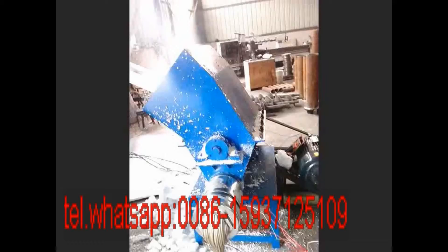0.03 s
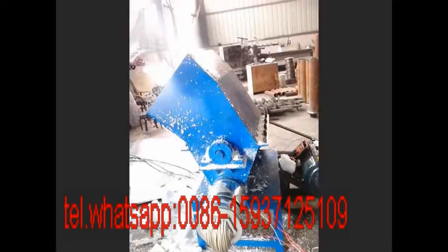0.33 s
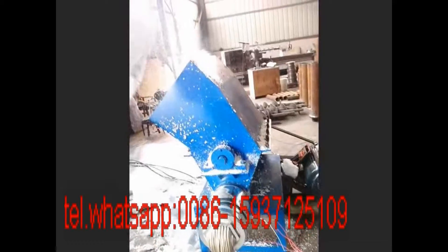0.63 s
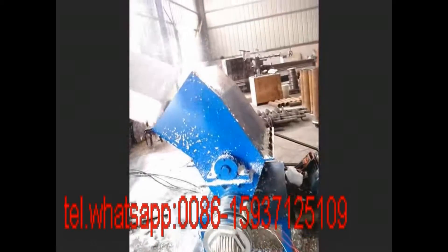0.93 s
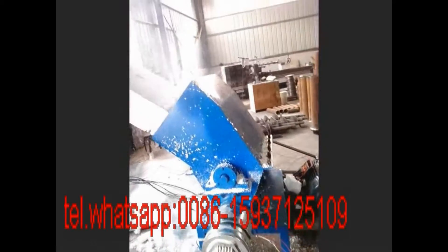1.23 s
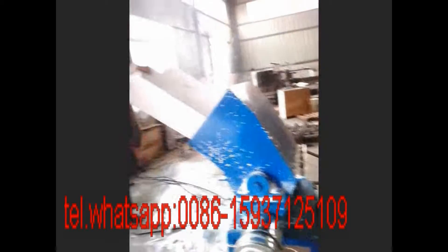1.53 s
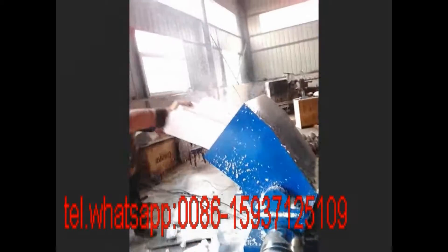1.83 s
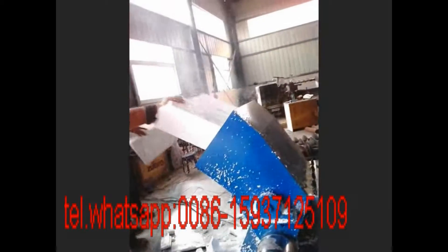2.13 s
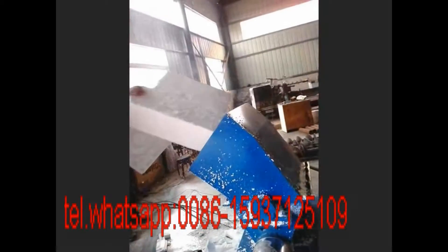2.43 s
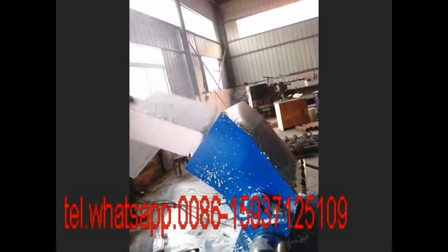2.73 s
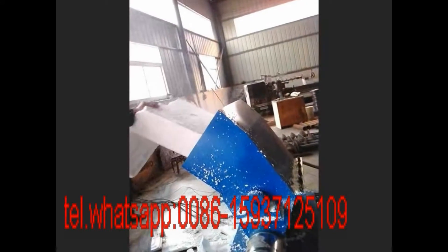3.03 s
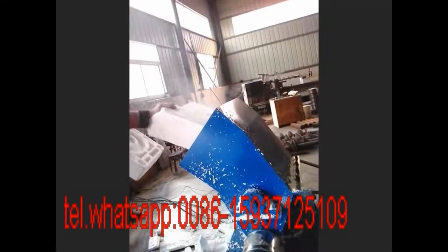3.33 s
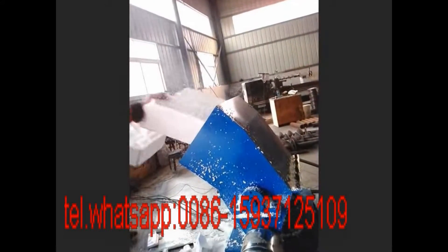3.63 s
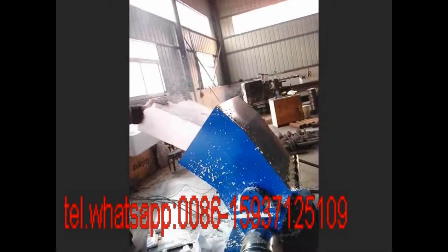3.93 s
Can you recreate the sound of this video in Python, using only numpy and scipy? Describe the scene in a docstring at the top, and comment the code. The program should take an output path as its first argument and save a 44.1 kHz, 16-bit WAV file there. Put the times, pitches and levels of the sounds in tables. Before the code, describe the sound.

Shredding machine chewing foam up close, with uneven crunching swells, thumps and brief squeaks.

```python
"""Foam shredder, close by, in a workshop: knives chip slabs in a dense stream of tiny fractures.
Each bite swells into clatter, crunch, rasp and hiss. Foam rubbing on steel squeaks.
The rotor hums at the knife-pass rate; lumps that catch in it thump the steel hopper.
Behind it: low workshop rumble and a short room tail."""
import sys
import numpy as np
from scipy import signal
from scipy.fft import rfft, irfft
from scipy.io import wavfile
from scipy.ndimage import uniform_filter1d, minimum_filter1d

SR = 44100
rng = np.random.default_rng(int(sys.argv[2]) if len(sys.argv) > 2 else 0)


def generate_wav(signal):
    """Clip the signal to [-1, 1] and save it as 16-bit WAV at the path in sys.argv[1]."""
    frames = np.transpose(np.atleast_2d(signal))
    scaled = np.clip(frames, -1, 1) * 32767
    pcm = np.round(scaled).astype(np.int16)
    wavfile.write(sys.argv[1], SR, pcm)


N = 176400

# workshop rumble: spectrum (f/Hz, gain/dB), level
RUMBLE_EQ, RUMBLE_DB = [(55, -25.5), (110, -17.5), (600, -29)], -31.5
# rotor hum between thumps: t/s, level/dB
HUM_LEVELS = [(.2, -25.5), (.32, -43), (.42, -24.5), (.78, -25.5), (.84, -44), (1.06, -37), (1.12, -25),
              (1.5, -20), (1.74, -22.5), (1.86, -15), (2.24, -27.5), (3.45, -30), (3.6, -22.5), (3.8, -23),
              (4, -43)]
# steady hopper boom: t/s, level/dB
BOOM_LEVELS = [(.3, -31), (.42, -21.5), (1.05, -26.5), (1.85, -26), (2.2, -29.5), (3.3, -26.5), (3.52, -35)]
# resonances: f/Hz, nominal width/Hz, level/dB
HOPPER_MODES = [(256, 27, -4.5), (280.8, 33, 2)]
HOUSING_AIR_MODES = [(133.1, 11.8, -1), (155.1, 18.5, 2.5), (203.6, 8.3, 1.5)]
# lumps catching in the rotor: t/s, hum surge/dB, hopper boom/dB
LUMP_THUMPS = [(0.357, -15.5, -17), (.67, -19, -27), (.712, -34, -15.5), (.775, -29, -16),
               (0.926, -19.5, -20.5), (1.261, -16, -41), (1.669, -16.5, -21.5), (2.106, -15.5, -36),
               (2.325, -21.5, -28), (2.528, -15.5, -18.5), (2.675, -24.5, -27), (2.797, -27, -17.5),
               (2.847, -21, -34), (3.175, -23.5, -35), (3.365, -15, -26)]
# foam on steel: t/s, f/Hz, level/dB
LOUD_SQUEAKS = [(0.439, 4640, -22), (2.805, 6830, -19.5), (3.397, 6640, -7), (3.428, 3307, -18.5),
                (3.461, 4380, -19)]
# steady chipping between bites: t/s, crunch/dB, hiss/dB
FEED_LEVELS = [(.2, -33, -36.5), (.42, -28, -26), (.8, -27.5, -25), (1.12, -30, -32), (1.55, -30.5, -31.5),
               (1.85, -28, -24.5), (2.24, -28, -26), (2.9, -28.5, -26), (3.35, -28, -28.5),
               (3.6, -37.5, -34), (4, -33.5, -33.5)]
# knife bites: t/s, length/s, clatter/dB, crunch/dB, rasp/dB, hiss/dB
KNIFE_BITES = [(0.532, 0.075, -36, -23, -44, -23.5), (0.633, 0.057, -36, -21.5, -23.5, -21.5),
               (0.736, 0.065, -43, -22, -27.5, -25.5), (0.94, 0.057, -25, -18.5, -23.5, -25.5),
               (1.163, 0.064, -32, -23.5, -40, -32), (1.369, 0.079, -29.5, -29, -34, -28.5),
               (1.593, 0.048, -23, -22, -33, -24), (1.683, 0.047, -19, -24, -51, -50),
               (1.721, 0.049, -33, -17, -29.5, -21), (2.083, 0.041, -23.5, -34, -60, -25),
               (2.298, 0.034, -29, -19, -46, -39), (2.417, 0.069, -31, -23.5, -44, -19.5),
               (2.512, 0.074, -27, -24, -40, -23.5), (2.606, 0.089, -21, -20, -60, -25),
               (2.811, 0.013, -30, -25, -46, -29), (3.11, 0.037, -21.5, -58, -33, -23.5),
               (3.331, 0.039, -18, -28, -39, -23), (3.386, 0.029, -31, -23.5, -22.5, -10.5),
               (3.424, 0.085, -43, -48, -23.5, -16)]
# chipping spectra: f/Hz, gain/dB
CLATTER_EQ = [(230, -29), (330, -10), (395, 1), (490, -1.5), (660, 1), (790, -8.5), (1300, -27.5)]
CRUNCH_EQ = [(550, -33.5), (850, -0.5), (1200, 0), (1720, 0.5), (2050, -9.5), (5000, -28)]
RASP_EQ = [(1500, -27), (2400, 5), (3300, 10), (3800, 4), (4600, 5), (5600, -18), (6800, 0.5)]
HISS_EQ = [(1200, -45), (2200, -8), (3800, -6), (4700, 0.5), (6200, -0.5), (6700, 5), (7100, 7),
           (7500, -14), (8000, -37.5)]

ATTACK_S, RELEASE_S, THUMP_S = 0.014, 0.024, 0.037
ROOM_T60_S, ROOM_MID_DB, ROOM_SIDE_DB, PAN_DB = 0.15, -10, -20.5, -27.5
KNIFE_PASS_HZ, ROTOR_DRIFT, HUM_FLUTTER_DB = 183.4, 0.0099, 3
STIR_DB, THUD_DB, CLATTER_DB = 1, -8, 0.5
SQUEAK_S, RUB_HZ, RUB_LOG_SPREAD, RUB_GAIN_DB = 0.0311, 5730, .15, -6
START_S, FADE_S, CEILING = 0.16, 0.056, .8
BAND_HZ, MIRROR_CARRIER_HZ, MIRROR_DB, TOP_HZ = 7650, 16000, -16, 9450


def undb(db):
    """dB to gain."""
    return 10 ** (np.asarray(db) / 20)


def unit(x):
    """Scale to rms 1."""
    return x / np.sqrt(np.mean(x ** 2) + 1e-18)


def curve(table, column=1):
    """Gain over time from one dB column."""
    rows = np.array(table)
    return undb(np.interp(np.arange(N) / SR, rows[:, 0], rows[:, column]))


def walk(rate_hz):
    """Smooth random drift, rms 1."""
    f = np.arange(N // 2 + 1) * SR / N
    return unit(irfft(rfft(rng.standard_normal(N)) * np.exp(-(f / rate_hz) ** 2), N))


def colour(x, eq):
    """Filter by (f/Hz, gain/dB) points; rms 1."""
    points, f = np.array(eq), np.arange(N // 2 + 1) * SR / N
    gain_db = np.interp(np.log(f + 1), np.log(points[:, 0]), points[:, 1])
    return unit(irfft(rfft(x) * undb(gain_db), N))


def ring(x, modes):
    """Steep-sided resonances driven by x."""
    out = 0
    for hz, width_hz, db in modes:
        b, a = signal.iirpeak(hz, hz / (1.39 * width_hz), fs=SR)
        out = out + undb(db) * unit(signal.lfilter(b, a, signal.lfilter(b, a, x)))
    return unit(out)


def clicks(per_s, spread_db):
    """Impulses of random time, size and sign."""
    size = undb(spread_db * np.minimum(rng.exponential(size=N), 2))
    return unit((rng.random(N) < per_s / SR) * size * np.sign(rng.standard_normal(N)))


def swell(start_s, length_s):
    """Envelope of one blow: attack, hold, release."""
    age_s = np.arange(N) / SR - start_s
    return np.clip(age_s / ATTACK_S, 0, 1) * np.exp(-np.maximum(age_s - length_s, 0) / RELEASE_S)


def rumble(db):
    """Workshop background: steady low noise."""
    return undb(db) * colour(rng.standard_normal(N), RUMBLE_EQ)


def room(x):
    """Diffuse tail from walls and clutter."""
    t = np.arange(SR // 2) / SR
    tail = rng.standard_normal(len(t)) * np.exp(-np.log(1000) * t / ROOM_T60_S) * (t > .003)
    return signal.fftconvolve(x, tail / np.sqrt(np.sum(tail ** 2)))[:N]


def thumps(column):
    """Lumps catch in the rotor: power sum of their envelopes."""
    return np.sqrt(sum((undb(row[column]) * swell(row[0], THUMP_S)) ** 2 for row in LUMP_THUMPS))


def rotor():
    """Passing knives push air; the hum wavers in pitch and level and surges at each thump."""
    phase = 2 * np.pi * np.cumsum(KNIFE_PASS_HZ * (1 + ROTOR_DRIFT * walk(16.4))) / SR
    flutter = unit(undb(HUM_FLUTTER_DB * walk(8)))
    return unit(np.sin(phase)) * np.hypot(flutter * curve(HUM_LEVELS), thumps(column=1))


def hopper():
    """Tumbling lumps drum on the hopper and stir the housing air; thumps swell both."""
    load = curve(BOOM_LEVELS)
    boom = ring(clicks(900, 0.94), HOPPER_MODES) * np.hypot(load, thumps(column=2))
    stir = np.sqrt(load * curve(FEED_LEVELS)) * undb(STIR_DB + 2 * walk(20))
    thud = undb(THUD_DB) * thumps(column=1)
    return boom + ring(clicks(1200, 0.68), HOUSING_AIR_MODES) * np.hypot(stir, thud)


def squeak(start_s, hz, length_s, glide=0.043, roughness=.03):
    """Stick-slip of foam on steel: one short, rough glide."""
    progress, out = np.linspace(0, 1, int(length_s * SR)), np.zeros(N + SR)
    jitter = np.interp(progress * length_s, np.arange(SR) / 1000, rng.standard_normal(SR))
    pitch_hz = hz * (1 + glide * rng.standard_normal() * (progress - .5) + roughness * jitter)
    tone = np.sqrt(2) * np.sin(2 * np.pi * np.cumsum(pitch_hz) / SR)
    at = int(start_s * SR)
    out[at:at + len(tone)] = np.sin(np.pi * progress) * tone
    return out[:N]


def rubbing(count=90):
    """Foam rubs on steel: a few loud squeaks, many small ones that follow the feed."""
    loud = sum(undb(db) * squeak(start_s, hz, SQUEAK_S) for start_s, hz, db in LOUD_SQUEAKS)
    small = 0
    for when, size, stretch in rng.random((count, 3)):
        hz = RUB_HZ * np.exp(RUB_LOG_SPREAD * rng.standard_normal())
        small += size * squeak(when * N / SR, hz, SQUEAK_S * (.5 + 2 * stretch))
    feed = curve(FEED_LEVELS, column=2)
    return loud + undb(RUB_GAIN_DB) * small * feed * unit(feed)


def fractures(eq, per_s, spread_db, depth_db, rate_hz):
    """Click stream; its bands swell and fade separately as pieces of changing size break off."""
    spectrum = rfft(colour(clicks(per_s, spread_db), eq))
    band_index = 12 * np.log1p(np.arange(N // 2 + 1) * SR / N / 1200)
    bands = (irfft(spectrum * np.maximum(1 - abs(band_index - k), 0), N) for k in range(26))
    return unit(sum(band * undb(depth_db * walk(rate_hz)) for band in bands))


def bites(column):
    """Knives bite the slab: power sum of their envelopes."""
    return np.sqrt(sum((undb(row[column]) * swell(row[0], row[1])) ** 2 for row in KNIFE_BITES))


def chipping():
    """Knives chip foam: clatter of lumps; crunch, rasp and hiss of bursting cells."""
    feed = curve(FEED_LEVELS)
    clatter = fractures(CLATTER_EQ, per_s=1500, spread_db=0.69, depth_db=2.35, rate_hz=14.5)
    crunch = fractures(CRUNCH_EQ, per_s=4000, spread_db=0.94, depth_db=3.9, rate_hz=22)
    rasp = fractures(RASP_EQ, per_s=8000, spread_db=0.9, depth_db=4.4, rate_hz=45)
    hiss = fractures(HISS_EQ, per_s=12000, spread_db=3.4, depth_db=3.3, rate_hz=14.7)
    return (clatter * np.hypot(feed * undb(CLATTER_DB), bites(column=2))
            + crunch * np.hypot(feed, bites(column=3))
            + rasp * bites(column=4)
            + hiss * np.hypot(curve(FEED_LEVELS, column=2), bites(column=5)))


def scene():
    """Machine ahead, foam slightly right, room a little wide."""
    foam, body = chipping() + rubbing(), rotor() + hopper()
    mid = body + foam + undb(ROOM_MID_DB) * room(foam) + rumble(RUMBLE_DB)
    side = undb(ROOM_SIDE_DB) * room(foam + undb(-14.0) * body) + rumble(db=-45.5)
    return np.array([mid + side, mid - side]) + undb(PAN_DB) * foam * np.array([[-1], [1]])


def record(dry):
    """Fade-in, band limit, treble faintly mirrored upward, peak limiter, low-pass."""
    t = np.arange(N) / SR
    x = dry * np.clip((t - START_S) / FADE_S, 0, 1) ** 3
    x = signal.sosfilt(signal.ellip(10, .3, 70, BAND_HZ, fs=SR, output="sos"), x)
    treble = signal.sosfilt(signal.butter(8, 6500, "high", fs=SR, output="sos"), x)
    x = x + undb(MIRROR_DB) * 2 * np.cos(2 * np.pi * MIRROR_CARRIER_HZ * t) * treble
    gain = CEILING / np.maximum(abs(x).max(axis=0), CEILING)
    x = x * uniform_filter1d(minimum_filter1d(gain, size=200), size=200)
    return signal.sosfilt(signal.ellip(10, .1, 90, TOP_HZ, fs=SR, output="sos"), x)


dry = scene()
out = record(dry)
generate_wav(out)
```